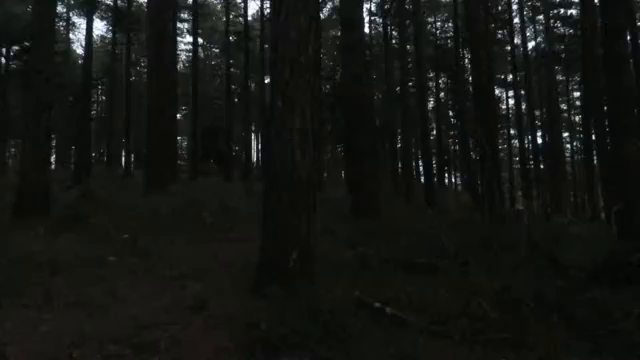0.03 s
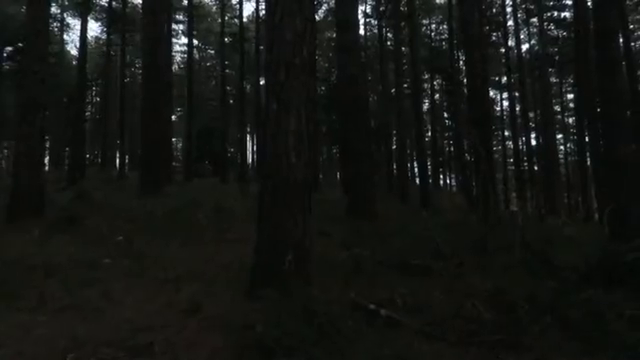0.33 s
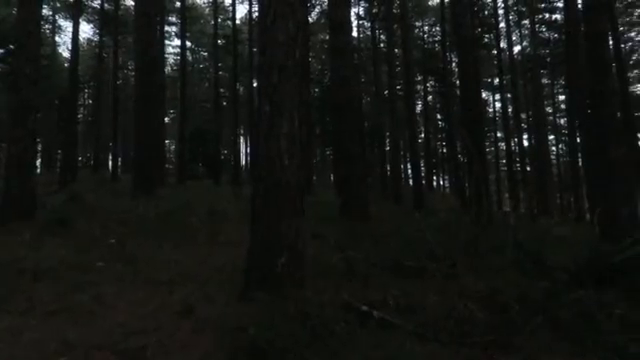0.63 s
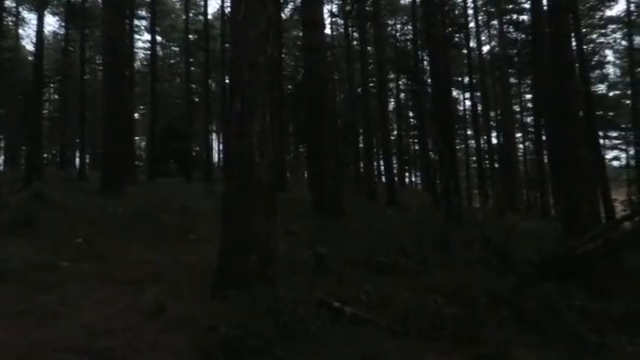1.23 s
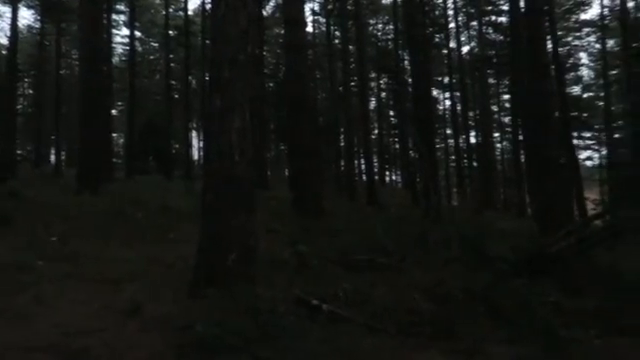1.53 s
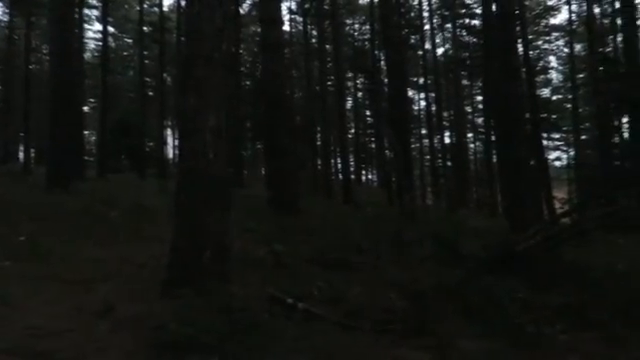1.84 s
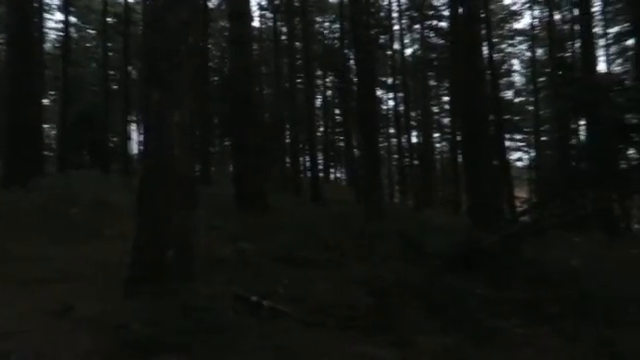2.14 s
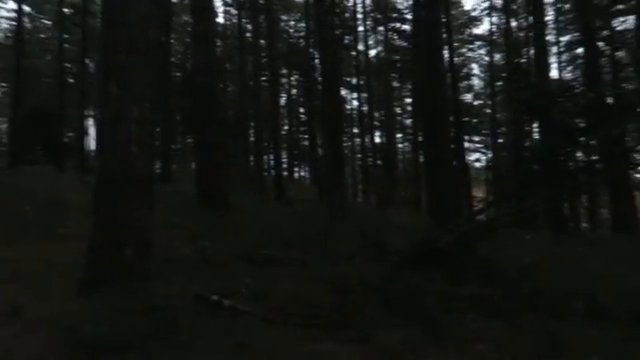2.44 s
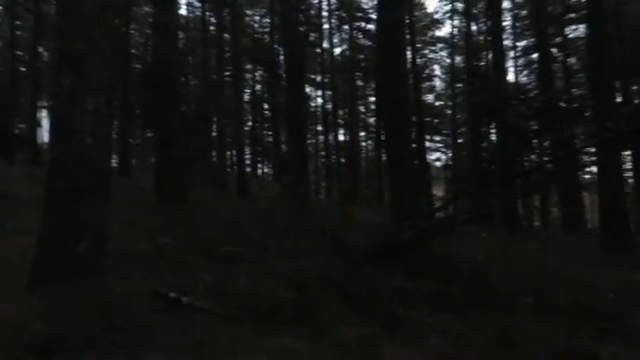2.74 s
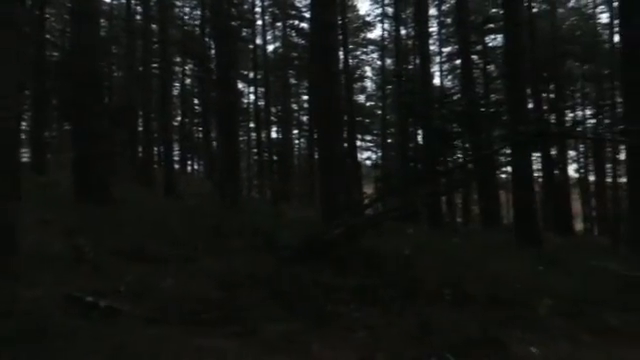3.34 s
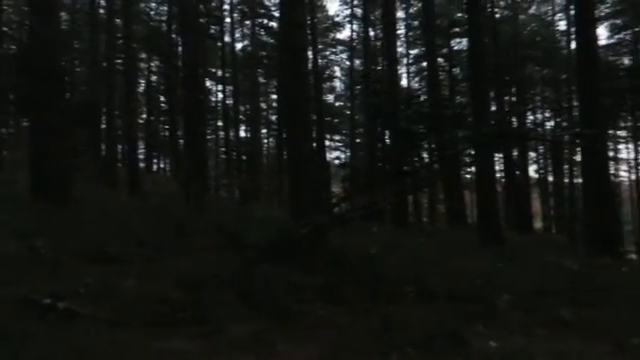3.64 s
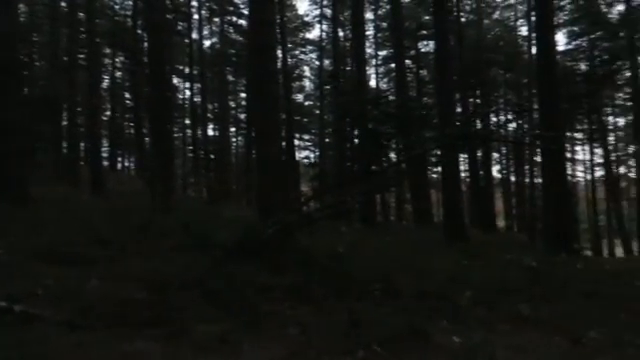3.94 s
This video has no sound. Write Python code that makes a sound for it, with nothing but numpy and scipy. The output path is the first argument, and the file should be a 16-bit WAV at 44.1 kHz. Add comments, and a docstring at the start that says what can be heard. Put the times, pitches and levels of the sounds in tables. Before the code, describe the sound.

Wind buffets the microphone with low fluttering thumps over a faint rush of pines.

```python
"""Wind buffets the microphone: a low flutter with soft thumps, a deep rumble in the first gust
and a short rasp on the hardest puffs, all from eddies pushing on its two ports.
Behind it, wind rushes through the needles of tall pines, swelling for a second and a half,
then holding. A far bird peeps once and two dry twigs tick."""
import sys
import numpy as np
from scipy import signal
from scipy.fft import rfft, irfft, next_fast_len
from scipy.io import wavfile
from scipy.ndimage import uniform_filter1d, map_coordinates

SR = 44100
rng = np.random.default_rng(int(sys.argv[2]) if len(sys.argv) > 2 else 0)


def wav_out(sig):
    """Save sig, one row per channel (or a flat mono array), as 16-bit PCM at SR to the path in sys.argv[1]."""
    wavfile.write(sys.argv[1], SR, np.round(np.clip(np.atleast_2d(sig).T, -1, 1) * 32767).astype(np.int16))


N = 176400


def amp(db):
    """dB to gain."""
    return 10 ** (np.asarray(db) / 20)


def unit_rms(x):
    """x at rms 1."""
    return x / np.sqrt(np.mean(x ** 2) + 1e-20)


def time_s():
    """Sample times."""
    return np.arange(N) / SR


def curve(rows):
    """Linear interpolation of (time, value) rows."""
    return np.interp(time_s(), *np.transpose(rows))


def bell(at_s, half_width_s):
    """Gaussian envelope, peak 1."""
    return np.exp(-((time_s() - at_s) / half_width_s) ** 2)


def wobble(knots_per_s):
    """Smooth random curve."""
    return map_coordinates(rng.standard_normal(4096), [time_s() * knots_per_s], mode="wrap")


def filtered(x, response):
    """FFT filter with gain response(hz)."""
    size = next_fast_len(N + SR // 2)
    return irfft(rfft(x, size) * response(np.fft.rfftfreq(size, 1 / SR)), size)[..., :N]


def coloured(x, spectrum):
    """x shaped by (frequency, level) rows, at rms 1."""
    knots_hz, db = np.transpose(spectrum)
    return unit_rms(filtered(x, lambda hz: amp(np.interp(np.log(hz + 1), np.log(knots_hz), db))))


def white():
    """White noise."""
    return rng.standard_normal(N)


def patchy(depth_db):
    """Noise whose gain drifts in time-frequency patches."""
    bins = signal.stft(white(), nperseg=512)[2]
    field = uniform_filter1d(rng.standard_normal(bins.shape), size=3, axis=0)
    field = uniform_filter1d(field, size=12, axis=1)
    return signal.istft(bins * amp(depth_db * unit_rms(field)), nperseg=512)[1][:N]


def stereo(mid, side):
    """Mid/side to left/right."""
    return np.array([mid + side, mid - side])


def swing(at_s, db, hz, phase_rad, half_width_cycles=0.62):
    """One short pressure swing of an eddy."""
    cycles = (time_s() - at_s) * hz
    return amp(db) * bell(at_s, half_width_cycles / hz) * np.cos(2 * np.pi * cycles + phase_rad)


def bird(at_s=2.0, pitch_hz=8460, fall_hz_per_s=5000):
    """One thin, slightly falling peep, far off to the left."""
    offset_s = time_s() - at_s
    chirp = np.sin(2 * np.pi * (pitch_hz - fall_hz_per_s * offset_s / 2) * offset_s)
    return amp(-65.5) * bell(at_s, half_width_s=0.011) * chirp * np.array([[1.6], [0.4]])


# twig ticks (time [s], level [dB])
TWIG_TICKS = [(2.525, -71), (2.906, -65)]
# tick spectrum (frequency [Hz], level [dB])
TWIG_SPECTRUM = [(2000, -30), (10000, -14), (11500, -1), (12500, 0), (13400, -9), (15000, -30)]


def twigs():
    """Dry twigs tick, half buried in the hiss."""
    bursts = sum(amp(db) * bell(at_s, half_width_s=0.0018) for at_s, db in TWIG_TICKS)
    return bursts * coloured(white(), TWIG_SPECTRUM)


# wind in the crowns (time [s], level [dB])
CROWN_LEVEL = [(0.1, -63.5), (0.5, -62), (0.95, -57.5), (1.45, -52), (2.7, -52), (4, -52)]
# needle rush, mid and side spectra (frequency [Hz], level [dB])
NEEDLE_MID = [(25, -39), (60, -11.5), (200, -21), (500, -1.5), (830, -1.5), (1200, -8.5), (1900, -17),
              (4000, -24), (8000, -32.5), (12800, -41.5), (14000, -46), (15000, -59)]
NEEDLE_SIDE = [(30, -67), (100, -34.5), (700, -12.5), (1100, 0.5), (1600, 3.5), (3200, -1), (6000, -8.5),
               (12000, -18), (14000, -23.5), (15000, -34.5)]


def pines(side_db=-9):
    """Countless needles hiss in the crowns: a centred roar under a wide treble."""
    mid = coloured(patchy(depth_db=1.85), NEEDLE_MID)
    side = amp(side_db) * coloured(patchy(depth_db=2), NEEDLE_SIDE)
    return amp(curve(CROWN_LEVEL)) * stereo(mid, side)


# hardest puffs (time [s], level [dB])
RASP_PUFFS = [(2.892, -46), (3.046, -37.5), (3.102, -39.5), (3.182, -39), (3.272, -37.5)]
# rasp spectrum (frequency [Hz], level [dB])
RASP_SPECTRUM = [(200, -39), (520, 0.5), (720, 1), (1100, -11.5), (1700, -29), (6000, -60)]


def rasps(mid_db=-3):
    """The hardest puffs break up at the ports with a short, brighter rasp."""
    puffs = sum(amp(db) * bell(at_s, half_width_s=0.013) for at_s, db in RASP_PUFFS)
    mid = amp(mid_db) * coloured(white(), RASP_SPECTRUM)
    side = coloured(white(), RASP_SPECTRUM)
    return puffs * stereo(mid, side)


# first gust (time [s], level [dB])
RUMBLE_LEVEL = [(0.075, -25), (0.1, -28), (0.13, -26), (0.16, -38.5), (0.2, -24.5), (0.225, -11.5),
                (0.25, -19), (0.275, -19.5), (0.3, -20), (0.33, -43.5), (0.4, -83)]
# rumble spectrum (frequency [Hz], level [dB])
RUMBLE_SPECTRUM = [(20, -16.5), (40, -6.5), (60, 0), (120, 3.5), (200, -1), (300, -15.5), (450, -29),
                   (560, -45), (1200, -79), (3000, -110)]


def rumble(mid_db=-13.5):
    """The first gust rumbles deeply, pushing the ports mostly in antiphase."""
    mid = amp(mid_db) * coloured(white(), RUMBLE_SPECTRUM)
    side = coloured(white(), RUMBLE_SPECTRUM)
    return amp(curve(RUMBLE_LEVEL)) * stereo(mid, side)


# antiphase eddies (time [s], level [dB], pitch [Hz])
SHOVE_EDDIES = [(0.086, -14, 65.7), (0.215, -16, 130), (0.231, -12, 200), (0.269, -6.5, 150),
                (0.296, -9, 188), (0.42, -22, 400), (0.644, -23, 330), (1.127, -25, 480), (1.37, -33, 460),
                (1.926, -25, 280), (1.966, -20.5, 302), (2.6, -34, 500), (3.1, -24.5, 520),
                (3.281, -21, 330)]


def shoves():
    """Single eddies push the two ports in opposite senses."""
    side = sum(swing(at_s, db, hz, 2 * np.pi * rng.random()) for at_s, db, hz in SHOVE_EDDIES)
    return stereo(0, side)


# eddies hitting both ports (time [s], relative level [dB], pitch [Hz])
THUMP_EDDIES = [(0.267, -21, 235), (0.422, -22.5, 318), (0.447, -22, 220), (0.569, -22, 237),
                (0.623, -25, 250), (0.642, -20, 287), (0.72, -23, 236), (1.003, -21, 423),
                (1.052, -22.5, 225), (1.1, -23.5, 273), (1.127, -19.5, 307), (1.205, -15.5, 275),
                (1.213, -15.5, 260), (1.227, -16, 266), (1.272, -21, 347), (1.301, -20, 271),
                (1.433, -10.5, 280), (1.56, -18, 194), (1.686, -17.5, 290), (1.72, -20, 266),
                (1.802, -8.5, 256), (1.814, -12, 260), (1.872, -16.5, 270), (1.92, -10.5, 223),
                (1.964, -14, 287), (2.019, -20, 280), (2.08, -21.5, 170), (2.203, -15.5, 180),
                (2.25, -22.5, 175), (2.389, -20.5, 225), (2.456, -16.5, 196), (2.539, -15.5, 253),
                (2.711, -12.5, 289), (2.761, -13, 204), (2.866, -14.5, 275), (2.892, -14.5, 386),
                (2.989, -15.5, 290), (3.043, -10, 330), (3.051, -13, 386), (3.096, -15, 222),
                (3.107, -11, 340), (3.135, -12, 306), (3.17, -11.5, 240), (3.272, -12.5, 378),
                (3.289, -10, 300), (3.417, -18.5, 400), (3.521, -21.5, 226), (3.555, -21, 293),
                (3.64, -24, 257), (3.651, -17.5, 270), (3.805, -24.5, 251)]


def thumps(gain_db=-1.5, skew_rad=0.26):
    """Single eddies thump softly, reaching the two ports slightly out of step."""
    out = np.zeros((2, N))
    for at_s, db, hz in THUMP_EDDIES:
        phases_rad = stereo(2 * np.pi * rng.standard_normal(), skew_rad * rng.standard_normal())
        out += [swing(at_s, db + gain_db, hz, phase_rad) for phase_rad in phases_rad]
    return out


# gusts at the microphone (time [s], relative level [dB])
GUST_LEVEL = [(0.08, -52.5), (0.2, -50.5), (0.26, -33), (0.34, -30.5), (0.39, -33.5), (0.45, -27.5),
              (0.53, -36), (0.6, -29.5), (0.65, -29.5), (0.69, -34.5), (0.77, -32), (0.83, -47),
              (0.97, -38), (1.06, -32.5), (1.13, -28.5), (1.17, -40), (1.21, -27.5), (1.37, -26),
              (1.41, -29), (1.47, -28.5), (1.555, -30.5), (1.59, -39), (1.66, -33), (1.73, -27),
              (1.77, -30), (1.83, -25), (1.89, -31), (2.0, -32.5), (2.14, -35.5), (2.23, -32.5),
              (2.29, -35.5), (2.43, -25.5), (2.52, -30.5), (2.6, -23.5), (2.69, -29), (2.83, -32),
              (2.88, -24), (2.92, -26.5), (3.08, -21), (3.17, -22), (3.21, -25), (3.28, -21.5),
              (3.33, -30.5), (3.41, -31.5), (3.47, -35.5), (3.53, -32.5), (3.61, -35.5), (3.68, -34.5),
              (3.83, -36), (3.87, -42.5), (3.93, -33.5), (4, -40)]
# port difference, side re mid (time [s], level [dB])
GUST_SIDE_LEVEL = [(0.2, 0), (0.72, 1), (0.86, -10), (2.0, -7.5), (2.28, -14.5), (2.41, -10), (3.3, -9),
                   (3.35, -23)]
# buffeting, mid and side spectra (frequency [Hz], level [dB])
BUFFET_MID = [(25, -33), (45, -24.5), (80, -7), (120, -1), (180, 1.5), (300, -2), (440, -8.5), (485, -12.5),
              (530, -23.5), (700, -30), (1100, -47.5), (2200, -64), (5000, -110)]
BUFFET_SIDE = [(40, -32.5), (100, -17.5), (160, -1), (240, 4.5), (420, 3.5), (485, -2), (540, -13),
               (750, -19.5), (1100, -32), (2200, -59), (5000, -100)]


def buffeting(flutter_db=4.5, lump_db=1.75, gain_db=-2.5):
    """Turbulence in gusts near the ground beats on the ports: fast flutter over slower lumps."""
    flutter = np.minimum(wobble(knots_per_s=170), 1)
    lumps = np.tanh(wobble(knots_per_s=30))
    turbulence = amp(flutter_db * flutter + lump_db * lumps)
    mid = coloured(turbulence * white(), BUFFET_MID)
    side = amp(curve(GUST_SIDE_LEVEL)) * coloured(turbulence * white(), BUFFET_SIDE)
    return amp(curve(GUST_LEVEL) + gain_db) * stereo(mid, side)


def scene():
    """The forest plus the wind on the microphone."""
    return pines() + buffeting() + rasps() + rumble() + shoves() + thumps() + twigs() + bird()


def record(dry):
    """The input opens after a moment and passes nothing above its band limit."""
    start_s, fade_s, limit_hz = 0.082, 0.004, 15100
    opening = np.clip((time_s() - start_s) / fade_s, 0, 1)
    return filtered(dry * opening, lambda hz: hz < limit_hz)


dry = scene()
out = record(dry)
wav_out(out)
```